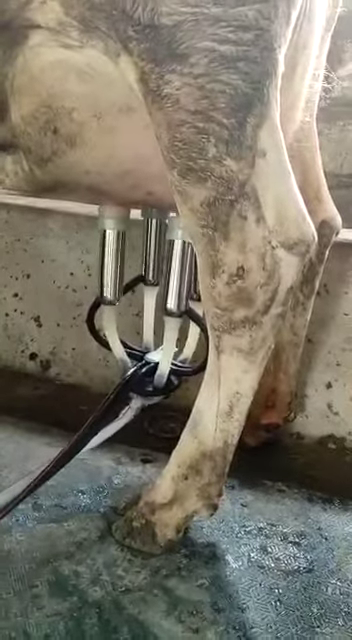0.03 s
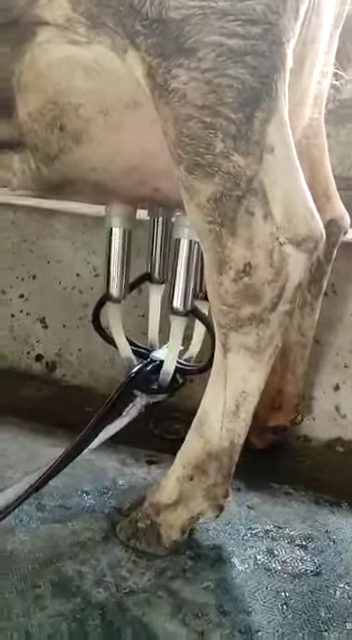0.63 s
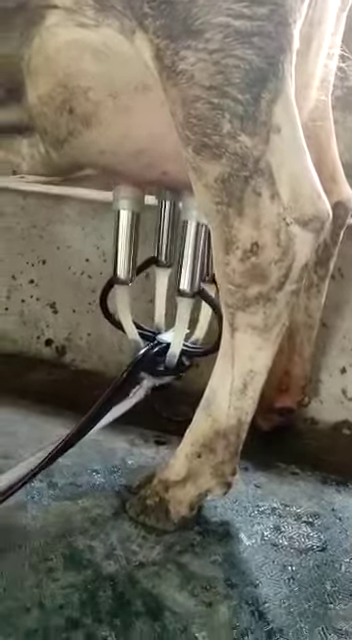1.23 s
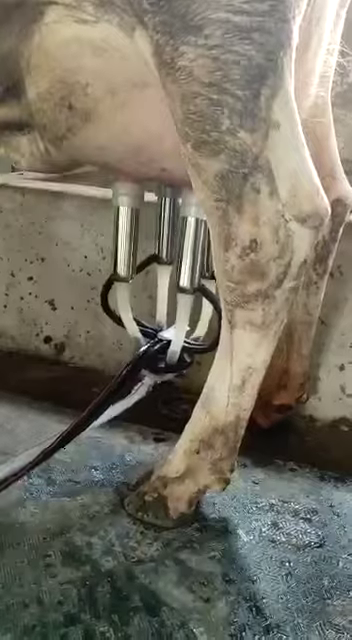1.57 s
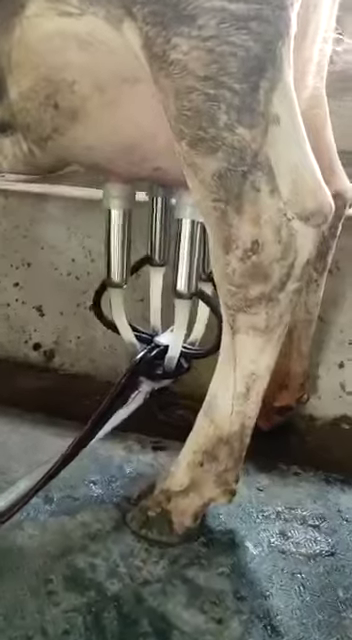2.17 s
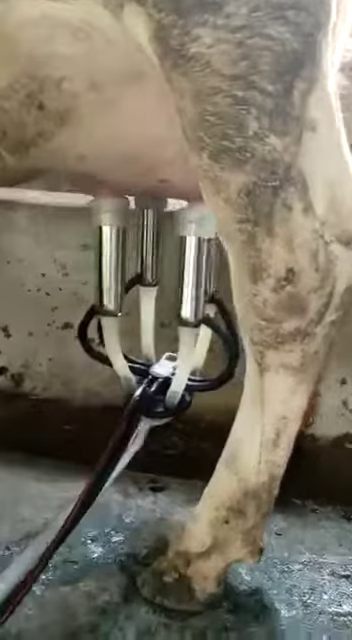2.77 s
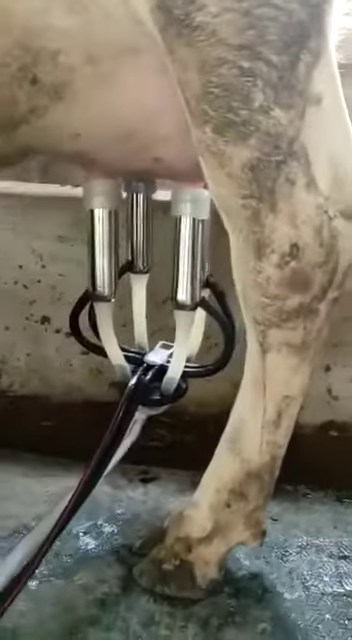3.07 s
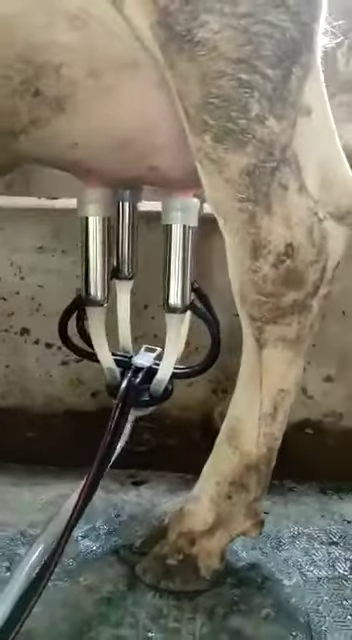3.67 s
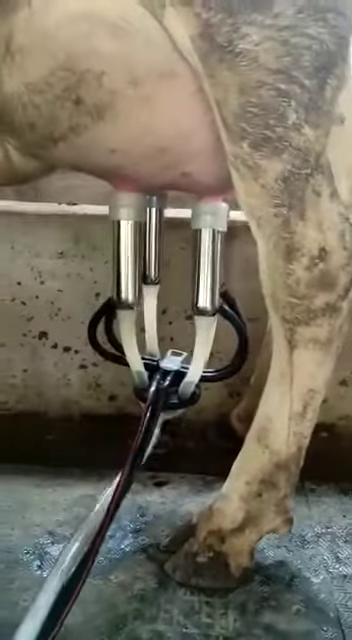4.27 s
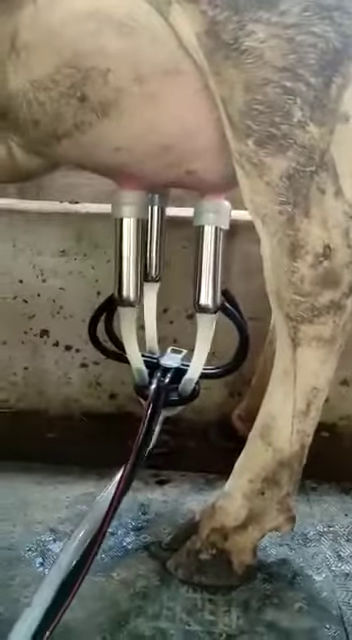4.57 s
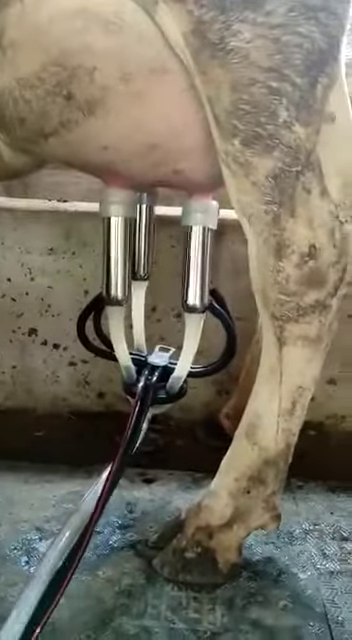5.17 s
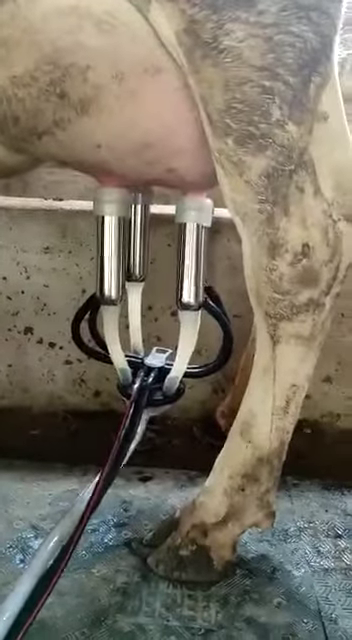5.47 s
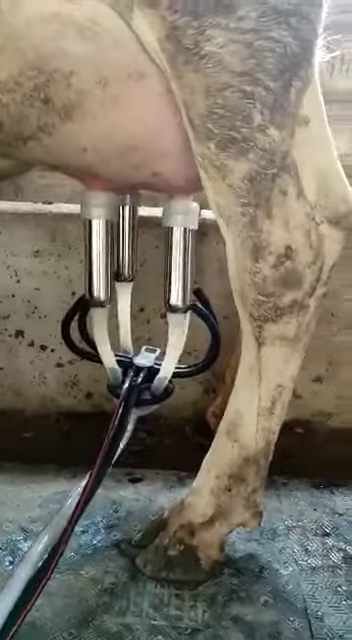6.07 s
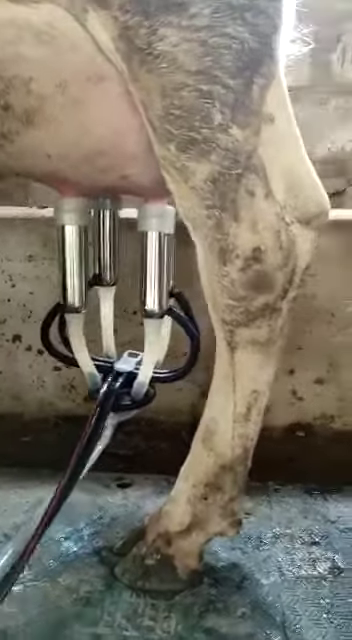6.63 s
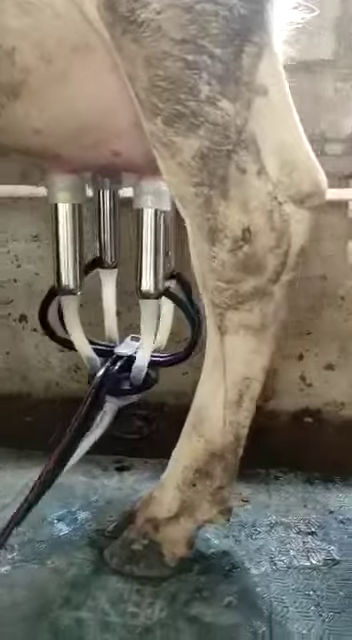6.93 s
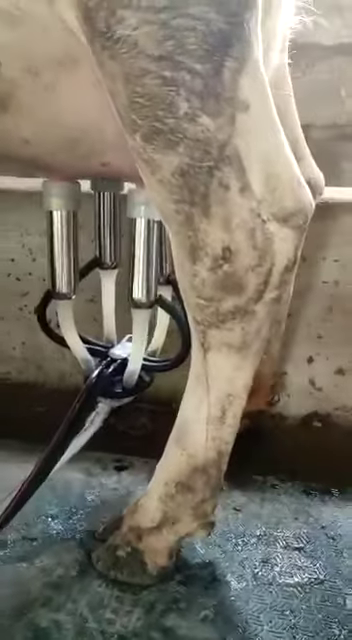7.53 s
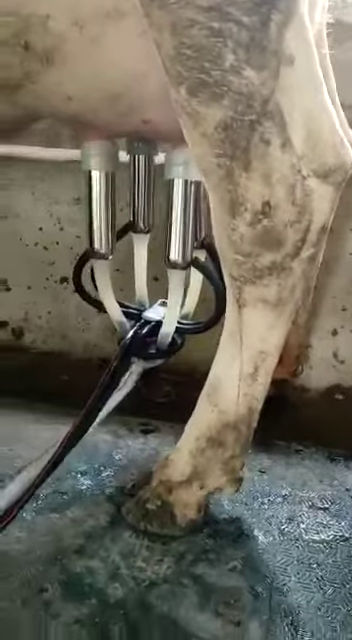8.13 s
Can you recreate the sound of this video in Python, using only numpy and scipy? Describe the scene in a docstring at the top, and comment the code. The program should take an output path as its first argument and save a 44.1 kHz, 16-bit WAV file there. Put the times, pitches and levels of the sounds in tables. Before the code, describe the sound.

A milking machine runs for the whole eight and a half seconds, heard close up in a concrete shed with a short echo. From about 0.2 seconds its valve clacks in an even tick-tock, one sharp, dry click roughly every 0.4 seconds, alternating between two slightly different tones. A soft, high puff of air follows each click. A thin, bright vacuum hiss continues throughout. Farther off, a motor-driven pump gives a steady low-mid drone with faint whines, a light rattle and a soft rushing exhaust. From about 3 to 6.5 seconds the microphone is nearer: the drone drops noticeably, the hiss rises a little and the clicks sound slightly crisper. Around 7 seconds the drone fills out again, with a very faint rumble of air on the microphone near 7.7 seconds. The clicking keeps its pace to the end.

```python
"""Milking machine in a concrete shed.

Beside the cow's udder the claw's air bleed hisses; farther off a belt-driven vane pump drones,
rattles and roars. The pulsator valve clacks to and fro, and after each stroke air sighs through
the pulse tubes. The listener leans in, draws partly back and steps aside; air rumbles faintly."""
import sys
import numpy as np
from scipy import signal
from scipy.fft import rfft, irfft
from scipy.io import wavfile
from scipy.ndimage import uniform_filter1d, map_coordinates

SR = 44100
rng = np.random.default_rng(int(sys.argv[2]) if len(sys.argv) > 2 else 0)


def wrap_up_sound(samples):
    """Save the sound to the file named by the first command line argument, as 16-bit audio."""
    columns = np.atleast_2d(samples).T
    # keep every value between -1 and 1, then stretch to whole-number steps
    tamed = np.clip(columns, -1, 1)
    steps = np.round(tamed * 32767).astype(np.int16)
    wavfile.write(sys.argv[1], SR, steps)


N = 370440
TIME, FREQ_HZ = np.arange(N) / SR, np.fft.rfftfreq(N, 1 / SR)
SHAFT_HZ, BELT_HZ = 24.224, 11.66


def gain_of(db):
    """Decibels to amplitude."""
    return 10 ** (np.asarray(db) / 20)


def unit_rms(x):
    """Scales to an rms of 1."""
    return x / np.sqrt(np.mean(x ** 2) + 1e-20)


def curve_at(points, hz):
    """Interpolates on a log-frequency axis."""
    point_hz, value = np.transpose(points)
    return np.interp(np.log(hz + 1), np.log(point_hz + 1), value)


def panned(side_db):
    """Left and right gains, side_db apart."""
    return gain_of(np.array([[.5], [-.5]]) * side_db)


def add(mix, start_s, sound):
    """Mixes in a stereo sound."""
    part = mix[:, max(round(start_s * SR), 0):][:, :sound.shape[1]]
    part += sound[:, :part.shape[1]]


def drift(rate_hz):
    """Smooth random curve of rms 1."""
    knots = rng.standard_normal(1024)
    curve = map_coordinates(knots, [TIME[::64] * rate_hz + 2], order=3, mode="wrap")
    return unit_rms(curve).repeat(64)[:N]


def stereo_pair(a, b, coherence):
    """Blends two independent signals into partly alike channels."""
    return np.array([a, coherence * a + np.sqrt(1 - coherence ** 2) * b])


def noise(colour_db, side_db=0, coherence=0):
    """Shaped stereo noise of rms 1."""
    pair = stereo_pair(*rfft(rng.standard_normal((2, N))), coherence)
    return unit_rms(irfft(pair * gain_of(colour_db) * panned(side_db), N))


def resonance_db(peaks, hz):
    """Lift from damped resonances."""
    return sum(db / (1 + (2 * (hz - peak_hz) / width_hz) ** 2) for peak_hz, width_hz, db in peaks)


def reflections_db(depth_db, count=12):
    """Echoes from legs, wall and floor ripple the spectrum at each ear."""
    delays_s = rng.uniform(.001, .012, (count, 2, 1))
    comb = sum(np.cos(2 * np.pi * FREQ_HZ[::8] * delay_s) for delay_s in delays_s)
    return depth_db * unit_rms(comb).repeat(8, axis=1)[:, :len(FREQ_HZ)]


# Listener's path. Each row: time in seconds, closeness 0-1.
CLOSENESS = [(0, 0.2), (2.2, 0.23), (2.6, 0.34), (3, 0.63), (3.7, 0.86), (4.7, 0.96), (5.6, 0.88),
             (6.5, 0.86), (7.5, 0.37), (8.4, 0.53)]
def closeness():
    """The listener leans in to the udder and draws partly back."""
    return np.interp(TIME, *np.transpose(CLOSENESS))


# Valve body resonances, in hiss and clacks. Each row: frequency in Hz, width in Hz, lift in dB.
VALVE_BODY = [(3545, 110, 2), (3980, 170, 5.5), (4370, 170, 10), (4930, 290, 9.5)]
# Hiss spectrum. Each row: frequency in Hz, level in dB.
HISS_COLOUR = [(100, -32), (1800, -33), (2500, -4.5), (3200, -13), (4400, -13.5), (5150, -9), (5450, -8.5),
               (5950, -4.5), (6350, -7), (6880, 0), (7100, -4), (7400, 3.5), (7750, 9), (8350, 3),
               (8850, 0.5), (9400, -2), (9900, -19), (11800, -17.5), (15500, -35)]
# Hiss balance. Each row: frequency in Hz, left over right in dB.
HISS_SIDE = [(2500, 1.5), (4000, -2.5), (6000, -2), (7500, -6), (8200, -2), (8900, 17), (9500, 2.5),
             (11000, 1), (12000, 1.5)]
def air_bleed(db=-31.5, flutter_db=1.33, flutter_hz=45, near_db=1, echo_db=4.3, ripple=0.061, spots=24):
    """Air whistles into the vacuum through a pinhole, a little louder close to the claw."""
    colour_db = curve_at(HISS_COLOUR, FREQ_HZ) + resonance_db(VALVE_BODY, FREQ_HZ)
    side_db = curve_at(HISS_SIDE, FREQ_HZ)
    place, hiss = np.linspace(0, spots - 1, N), np.zeros((2, N))
    for spot in range(spots):  # echoes shift as the listener moves
        crossfade = np.sqrt(np.maximum(1 - abs(place - spot), 0))
        hiss += crossfade * noise(colour_db + reflections_db(echo_db), side_db)
    # the vacuum ripples with each turn and each vane of the pump
    pulses = sum(np.cos(2 * np.pi * (order * SHAFT_HZ * TIME + rng.random())) for order in (1, 2, 4))
    level_db = db + near_db * closeness() + flutter_db * drift(flutter_hz)
    return gain_of(level_db) * (1 + ripple * pulses) * hiss


# Standing waves of drone, overtone, whine and rattle. Each row: closeness at a node,
# node spacing in closeness, crest in dB, node in dB.
STANDING_WAVES = [(1, 2.74, -1.26, -19), (0.14, 0.8, 1, -2.5), (0.53, 1.95, -2, -18),
                  (0.085, 1.66, 4, -2.5)]
def standing_waves_db():
    """Four level curves as the listener moves through nodes and crests."""
    levels_db = []
    for node, spacing, crest_db, node_db in STANDING_WAVES:
        crest_share = np.sin(np.pi * (closeness() - node) / spacing) ** 2
        power = crest_share * gain_of(crest_db) ** 2 + (1 - crest_share) * gain_of(node_db) ** 2
        levels_db.append(10 * np.log10(power))
    return levels_db


def machine_tone(hz, db, side_db, throb, spread_rad, slip_rad=0.09, flap_rad=0.4, blur_hz=2300):
    """One tone, swelling once per lap of the belt; high tones jitter more."""
    phase = 2 * np.pi * (hz * TIME + rng.random()) + slip_rad * drift(1.95)
    phase += (hz / blur_hz) ** 2 * drift(30)
    belt = 1 + throb * np.cos(2 * np.pi * (BELT_HZ * TIME + rng.random()) + flap_rad * drift(6))
    pair = np.sin([phase, phase + spread_rad * rng.standard_normal()])
    return np.sqrt(2) * gain_of(db) * belt * panned(side_db) * pair


# Listener's step aside. Each row: time in seconds, share of the step 0-1.
STEP_ASIDE = [(6.5, 0), (7.3, 1)]
# Pump harmonics. Each row: shaft order, level in dB, left over right in dB, belt throb 0-1,
# drone wave weight, overtone wave weight, gain from the step aside in dB.
DRONE = [(4, -55.5, -1, 0.3, 0.31, 0.31, 0), (8, -46.5, 3, 0, 0.45, -0.32, 0.5),
         (10, -89, 14, 0.4, 0.36, -0.73, 2), (11, -56, -8, 0, 0, 0.04, -2),
         (12, -29, 1, 0.13, 1, -0.29, -1), (14, -63, -7, 0.7, 0.85, 0.23, 8),
         (16, -51, 0, 0.4, 0.054, -0.4, -3.5), (20, -55, 2, 0.44, 0.017, 0.25, 4.5),
         (24, -59.5, 4, 0.75, 0.37, 0.39, -1)]
# Motor, belt and bearing tones. Each row: frequency in Hz, level in dB, left over right in dB,
# belt throb 0-1, whine wave weight, rattle wave weight.
WHINES = [(91.3, -64.5, 1, 0.3, 0, 0.44), (100.1, -56, 1.5, 0.26, 0, 0.22), (113.2, -60, 5, 0.43, 0, 0.39),
          (278.6, -65, 14, 0.1, 1, -1.1), (300.5, -60, 4, 0.6, 0.48, 0.83),
          (955.5, -45, 18, 0.36, 0.65, -0.21), (972.5, -57.5, 20.5, 0.3, 0.86, 1.9),
          (1052, -55.5, 8, 1, 0.92, 0.8), (1174, -50, 1.5, 0.2, 0.3, -0.29),
          (1336, -56, 3, 0.34, 0.37, 0.086), (1571, -62.5, 9, 0.6, 0.092, 1.2),
          (1632, -55.5, 7, 0.37, 0, 1.2), (2040, -53, 3, 1, 0.53, -0.42)]
def pump(fade_db=1):
    """Four vanes puff on each turn; drone and whines stand between the walls."""
    drone_db, overtone_db, whine_db, rattle_db = standing_waves_db()
    aside = np.interp(TIME, *np.transpose(STEP_ASIDE))
    out = np.zeros((2, N))
    for order, db, side_db, throb, drone_weight, overtone_weight, aside_db in DRONE:
        level_db = db + drone_weight * drone_db + overtone_weight * overtone_db + aside_db * aside
        out += machine_tone(order * SHAFT_HZ, level_db, side_db, throb, spread_rad=0.11)
    for hz, db, side_db, throb, whine_weight, rattle_weight in WHINES:
        level_db = db + whine_weight * whine_db + rattle_weight * rattle_db + fade_db * drift(2.91)
        out += machine_tone(hz, level_db, side_db, throb, spread_rad=hz / 1600)
    return out


# Pump housing response. Each row: frequency in Hz, level in dB.
HOUSING = [(50, -36), (150, 1.5), (400, -6), (750, -12.5), (880, 5.5), (925, 2), (1005, -9), (1045, 3.5),
           (1110, -9), (1250, 0.5), (1370, 1.5), (1480, -7), (1560, 9.5), (1660, 4.5), (1740, -7),
           (1850, -0.5), (2050, -28), (2400, -32), (3200, -47)]
def vane_rattle(db=-45, vane_depth=0.21, side_db=5, wave_weight=0.36):
    """The vanes scrape in a pattern that repeats every second turn and rings the housing."""
    period = round(2 * SR / SHAFT_HZ)
    patterns = rng.standard_normal((5, 2, period))[:, :, np.arange(N) % period]
    scrape = sum(drift(2.013) * pattern for pattern in patterns)  # paths through the shed come and go
    scrape /= np.sqrt(uniform_filter1d((scrape ** 2).mean(0), period) + 1e-9)
    scrape *= 1 + vane_depth * np.cos(2 * np.pi * 4 * SHAFT_HZ * TIME)
    rung = unit_rms(irfft(rfft(scrape) * gain_of(curve_at(HOUSING, FREQ_HZ)), N))
    return gain_of(db + wave_weight * standing_waves_db()[-1]) * panned(side_db) * rung


# Exhaust spectrum in the shed. Each row: frequency in Hz, level in dB.
ROAR_COLOUR = [(15, -58), (25, -40), (97, -10.5), (144, -22), (183, -10), (232, -9), (289, -5), (438, -11),
               (540, -14.5), (750, -15.5), (952, -8), (1120, -10.5), (2150, -10.5), (2520, -5), (2900, -27),
               (3770, -54), (6380, -120)]
# Exhaust resonances. Each row: frequency in Hz, width in Hz, lift in dB.
EXHAUST_PEAKS = [(694, 23, 8), (886, 50, 4), (970, 35, 9), (1070, 40, 2), (1162, 77, 7.5), (1367, 53, 4.5),
                 (1810, 71, 1.5)]
# Roar balance. Each row: frequency in Hz, left over right in dB.
ROAR_SIDE = [(50, 2), (300, 2.4), (700, 2), (1000, 3.9), (1600, 2.9), (2500, 0)]
# Likeness of left and right. Each row: frequency in Hz, coherence 0-1.
ROAR_COHERENCE = [(50, 0.86), (300, 0.45), (600, 0.38), (1000, 0.08), (1600, 0.58), (2500, 0.38)]
def exhaust_roar(db=-39.5):
    """The pump's exhaust, smeared by the shed into an even wash."""
    colour_db = curve_at(ROAR_COLOUR, FREQ_HZ) + resonance_db(EXHAUST_PEAKS, FREQ_HZ)
    return gain_of(db) * noise(colour_db, curve_at(ROAR_SIDE, FREQ_HZ), curve_at(ROAR_COHERENCE, FREQ_HZ))


# Rumble envelope. Each row: time in seconds, level in dB.
RUMBLE_LEVEL = [(0, -69), (2.5, -67), (4.5, -64), (5.4, -65), (6.1, -64), (7, -64), (7.7, -57), (8.4, -63)]
def air_rumble(peak_hz=60):
    """Air brushes the microphone."""
    colour_db = curve_at([(10, -12), (25, -2), (peak_hz, 1), (200, -25), (1000, -70)], FREQ_HZ)
    return gain_of(np.interp(TIME, *np.transpose(RUMBLE_LEVEL))) * noise(colour_db, coherence=0.99)


# Air flow after the outward and the return stroke. Each row: delay in seconds,
# Gaussian sigma in seconds, level in dB.
SIGHS = [(.214, 0.041, -36), (.255, 0.048, -37.5)]
# Sigh spectrum. Each row: frequency in Hz, level in dB.
SIGH_COLOUR = [(2000, -10.5), (3500, -14), (5000, -1), (6500, 9), (8500, 12.5), (10000, -0.5), (11300, 1.5),
               (12500, -11), (13700, -1.5), (15500, -17)]
def tube_sighs(cycle_s=.761, uneven_db=-2.2, sputter_db=3.0, sputter_hz=60, echo_db=5.0):
    """After each stroke the liners move and push air through the pulse tubes."""
    starts_s = [row[0] for row in STROKES]
    earlier_s = starts_s[1] - cycle_s  # return stroke of the cycle before
    flow = np.zeros(N)
    for k, start_s in enumerate([earlier_s, *starts_s]):
        delay_s, sigma_s, db = SIGHS[(k + 1) % 2]
        swell = np.exp(-.5 * ((TIME - start_s - delay_s) / sigma_s) ** 2)
        flow += gain_of(db + uneven_db * rng.standard_normal()) * swell
    sputter = gain_of(sputter_db * drift(sputter_hz))
    return flow * sputter * noise(curve_at(SIGH_COLOUR, FREQ_HZ) + reflections_db(echo_db))


def coloured(burst, colour_db, size=2048):
    """Minimum-phase filter; each channel ends with an energy of 1."""
    cepstrum = irfft(np.log(gain_of(colour_db)))
    cepstrum[1:size // 2] *= 2
    cepstrum[size // 2 + 1:] = 0
    impulse = irfft(np.exp(rfft(cepstrum)))
    rung = signal.fftconvolve(burst, impulse[None], axes=1)
    return rung / np.linalg.norm(rung, axis=1, keepdims=True)


def slide_chatter(t, decay_s, rise_s=.00032, bounce_s=.005, bounce_db=-8, strike_at_s=.0007):
    """The slide strikes, chatters and bounces once; the shorter the chatter, the harder the strike."""
    since_bounce_s = t - bounce_s * rng.uniform(.8, 1.2)
    bounce = gain_of(bounce_db) * (since_bounce_s > 0) * np.exp(-abs(since_bounce_s) / decay_s)
    envelope = (np.exp(-t / decay_s) + bounce) * (1 - np.exp(-t / rise_s))
    grit = stereo_pair(*rng.choice([-1., 1.], (2, len(t))), coherence=0.12)
    chatter = envelope / np.linalg.norm(envelope) * grit
    chatter[:, round(strike_at_s * SR)] += .00055 / decay_s
    return chatter


def seat_ping(hz, peak_s, lag_rad=0.9, size=1024):
    """The valve seat rings briefly; one ear gets it a little later."""
    t = np.arange(size) / SR
    phase = 2 * np.pi * hz * t + rng.choice([-.5, .5]) * np.array([[lag_rad], [-lag_rad]])
    return (t / peak_s) ** 2 * np.exp(2 - 2 * t / peak_s) * np.sin(phase)


# Outward stroke spectrum. Each row: frequency in Hz, level in dB.
OUT_COLOUR = [(60, -12), (500, -7), (800, -8), (1100, 4), (1600, -14.5), (2500, 6.5), (2950, -4.5),
              (3500, 6), (4300, 0.5), (5000, -11.5), (5600, 2.5), (6400, -4), (7600, 7.5), (8800, 0.5),
              (10000, -11.5), (15000, -32)]
# Return stroke spectrum. Each row: frequency in Hz, level in dB.
BACK_COLOUR = [(60, -15), (300, -3), (1100, -8), (1800, -8), (2300, -3.5), (3000, -0.5), (3700, 5.5),
               (4700, -11), (6000, -1), (7000, 13.5), (8000, 11), (8800, 9), (10000, -22), (15000, -23)]
# Wall and floor reflection. Each row: frequency in Hz, gain in dB.
WALLS = [(500, 3), (1000, 5), (1800, 5.5), (2500, 4), (3700, -0.5), (5200, 1), (8000, -5.5), (12000, 3)]
# Valve strokes, out and back in turn. Each row: start in seconds, chatter gain in dB, tilt in dB
# per octave, ping level in dB, ping pitch in Hz, low knock lift in dB, casing gain in dB,
# chatter decay in seconds, left over right in dB.
STROKES = [(0.1771, -6.5, -2, -24, 3780, 0, -3, 0.0025, -3),
           (0.5507, -10.3, -4.5, -30, 3910, -5, 4, 0.0025, -2),
           (0.9389, -6.5, -2, -21, 3780, 3, 2, 0.0025, -1), (1.3126, -7.5, -3.5, -30, 4030, 5, 0, 0.002, 0),
           (1.7, -9.7, -1, -23, 3790, -1, 0, 0.003, -4), (2.0729, -8.5, -3.5, -26, 3970, -6, 1, 0.0018, -1),
           (2.4609, -7.3, -1.5, -18, 3800, 1, -1, 0.002, -2.5),
           (2.8353, -6.5, 0, -25, 3640, -5, 2, 0.0016, 0), (3.2231, -7, 3, -16.5, 3600, 0, -6, 0.0013, 0),
           (3.5972, -7.5, 0, -18, 3850, 1, -1, 0.0016, 0), (3.9847, -6.5, -1, -18, 3950, -9, -2, 0.002, 1),
           (4.3587, -6, 0.5, -16, 3830, -5, -3, 0.0022, -1),
           (4.7467, -6.5, -2.5, -18, 3820, -9, -2, 0.0024, -1),
           (5.121, -7.5, 4, -17.5, 3890, -7, -9, 0.002, -1),
           (5.5098, -7.5, -2.5, -16, 3900, -2, 3, 0.002, 1),
           (5.8837, -4.3, 2, -16.5, 3820, 0, -1, 0.0021, -2),
           (6.2726, -6.5, -1, -15.5, 3810, -5, -2, 0.0014, -1), (6.6467, -9, 0, -26, 3730, 2, 0, 0.0022, 2),
           (7.036, -7, -0.5, -17, 3700, -1, -2, 0.0016, 3),
           (7.41, -10, -3.5, -25, 4020, 0, -4, 0.0022, -0.5),
           (7.7988, -7.5, -1, -22, 3950, -3, -3, 0.0022, -1),
           (8.1727, -7.5, -1.5, -24, 4110, -4, 0, 0.0017, -2)]
def pulsator(direct_db=11.5, scatter_db=-6, room_db=-3.3, seat_db=-3, knock_hz=1500, scatter_s=.004):
    """The slide clacks on its seat; near walls scatter the sound and the shed echoes it."""
    hz, t = np.fft.rfftfreq(2048, 1 / SR), np.arange(2048) / SR
    near, far = np.zeros((2, 2, N))
    knock_band = np.exp(-(hz / knock_hz) ** 2)
    octaves = np.log2(np.clip(hz, 2000, 9000) / 5000)
    for k, stroke in enumerate(STROKES):
        start_s, db, tilt_db, ping_db, ping_hz, knock_db, _, chatter_s, side_db = stroke
        spectrum, ping_peak_s = (BACK_COLOUR, .0013) if k % 2 else (OUT_COLOUR, .0008)
        chatter = slide_chatter(t, chatter_s)
        scatter = t * np.exp(-t / scatter_s) * rng.choice([-1., 1.], (2, len(t)))
        colour_db = curve_at(spectrum, hz) + resonance_db(VALVE_BODY, hz)
        echoed_db = colour_db + curve_at(WALLS, hz)
        seat_band = np.exp(-((hz - ping_hz) / 500) ** 2)  # here the seat rings and chatters less
        # the direct path changes with the angle to the valve
        beamed_db = colour_db + seat_db * seat_band + knock_db * knock_band + tilt_db * octaves
        add(near, start_s, gain_of(direct_db + db) * panned(side_db) * coloured(chatter, beamed_db))
        add(near, start_s, gain_of(scatter_db) * coloured(scatter, echoed_db))
        add(near, start_s, gain_of(ping_db) * panned(side_db) * seat_ping(ping_hz, ping_peak_s))
        add(far, start_s, gain_of(room_db) * coloured(chatter, echoed_db))
    return near + shed_echoes(far)


# Casing modes. Each row: frequency in Hz, outward level in dB, return level in dB, T60 in seconds.
CASING_MODES = [(1086, -38, -51, 0.025), (1123, -44, -47, 0.1), (2217, -39, -22.5, 0.035),
                (2410, -43, -25.5, 0.038), (2410, -31, -47, 0.01)]
def casing_knocks(rise_s=0.0028):
    """Each stroke knocks the pulsator's plastic casing."""
    t, out = np.arange(SR // 8) / SR, np.zeros((2, N))
    for k, (start_s, *_, casing_db, _, _) in enumerate(STROKES):
        for hz, out_db, back_db, t60_s in CASING_MODES:
            db = (back_db if k % 2 else out_db) + casing_db
            swing = np.sin(2 * np.pi * hz * t + np.pi * rng.random((2, 1)))
            add(out, start_s, gain_of(db - 60 * t / t60_s) * (1 - np.exp(-t / rise_s)) * swing)
    return out


def air_thumps(db=-53, hz=52, decay_s=0.023):
    """The valve lets in a slug of air with each stroke: a soft, low push."""
    t, out = np.arange(SR // 8) / SR, np.zeros((2, N))
    push = gain_of(db) * np.sin(2 * np.pi * hz * t) * np.exp(-t / decay_s)
    for start_s, *_ in STROKES:
        add(out, start_s, np.array([push, push]))
    return out


# Shed decay. Each row: frequency in Hz, T60 in seconds.
SHED_T60 = [(300, 0.21), (1500, 0.35), (3500, 0.22), (8000, 0.21), (14000, 0.056)]
def shed_echoes(sound, rise_s=.003, density=.15):
    """Dense echoes from concrete; the treble dies first."""
    t = np.arange(SR // 2) / SR
    taps = rng.standard_normal((2, len(t))) * (rng.random((2, len(t))) < density)
    taps *= 1 - np.exp(-(t / rise_s) ** 2)
    hz, age_s, bands = signal.stft(taps, SR, nperseg=256)
    decay = gain_of(-60 * age_s / curve_at(SHED_T60, hz)[:, None])
    tail = signal.istft(bands * decay, SR, nperseg=256)[1]
    return signal.fftconvolve(sound, tail / np.linalg.norm(tail[0]), axes=1)[:, :N]


def scene():
    """The milking cluster close by, the pump behind it."""
    cluster = pulsator() + casing_knocks() + air_thumps() + tube_sighs() + air_bleed()
    return cluster + pump() + vane_rattle() + exhaust_roar() + air_rumble()


def record(dry):
    """Steep low-pass at 15850 Hz."""
    lowpass = signal.firwin(511, 15850, window=("kaiser", 9), fs=SR)
    return signal.oaconvolve(dry, lowpass[None], "same")


dry = scene()
out = record(dry)
wrap_up_sound(out)
```